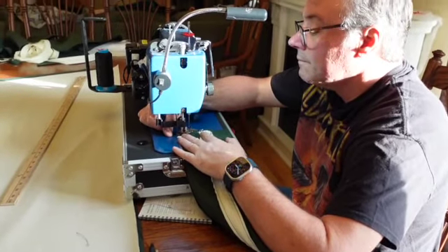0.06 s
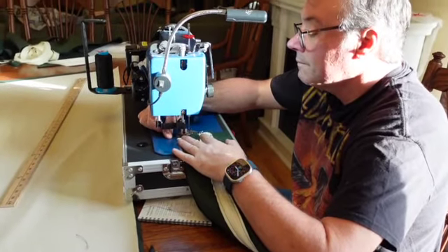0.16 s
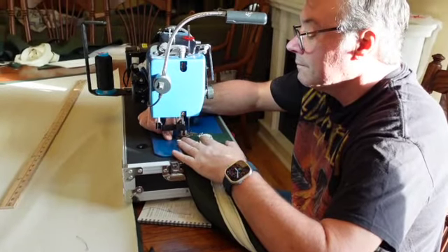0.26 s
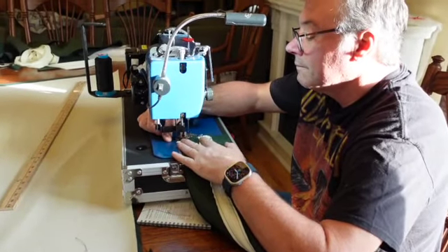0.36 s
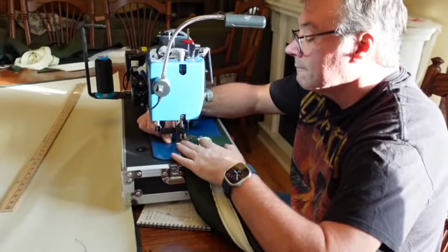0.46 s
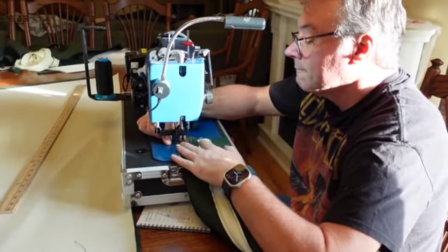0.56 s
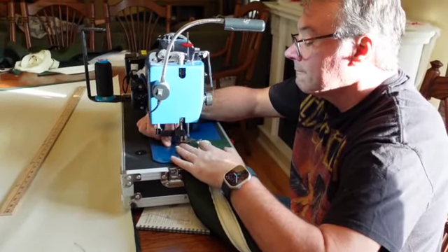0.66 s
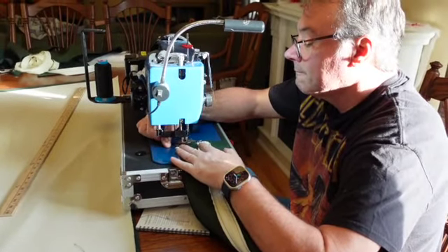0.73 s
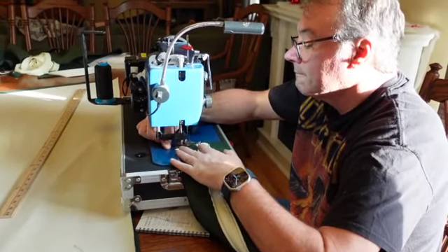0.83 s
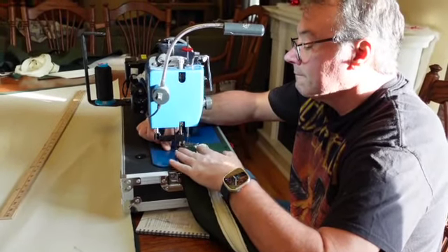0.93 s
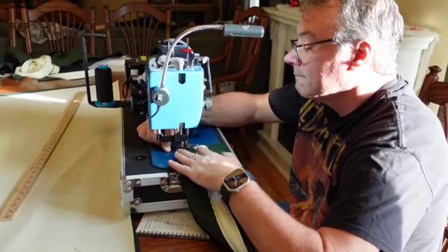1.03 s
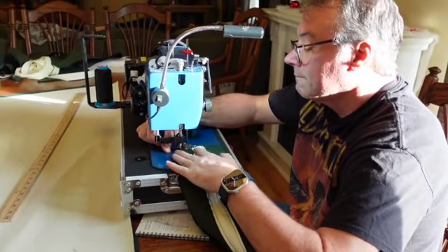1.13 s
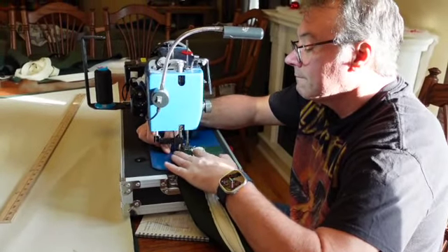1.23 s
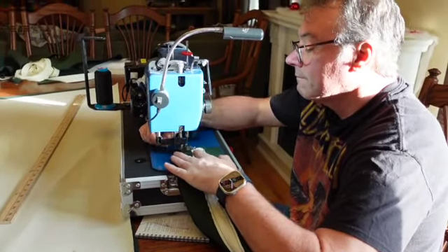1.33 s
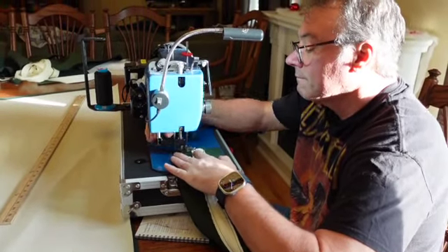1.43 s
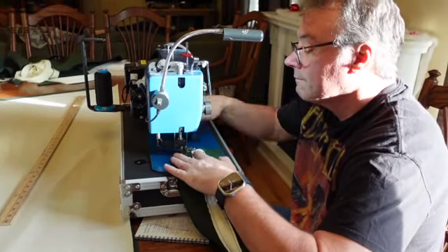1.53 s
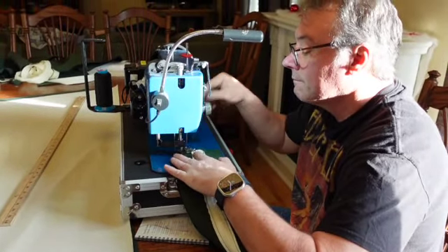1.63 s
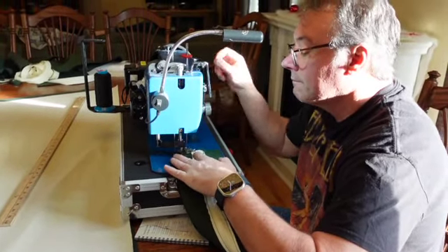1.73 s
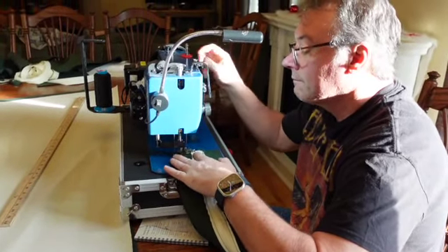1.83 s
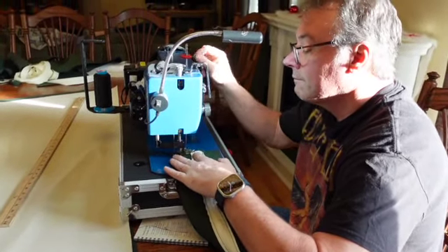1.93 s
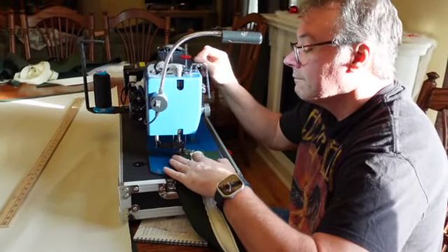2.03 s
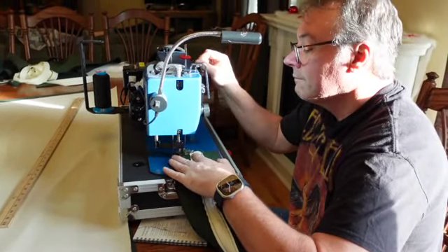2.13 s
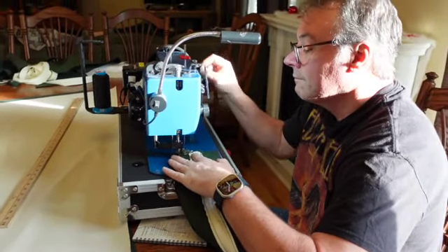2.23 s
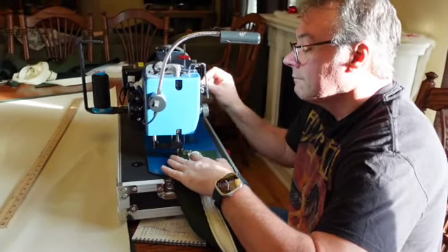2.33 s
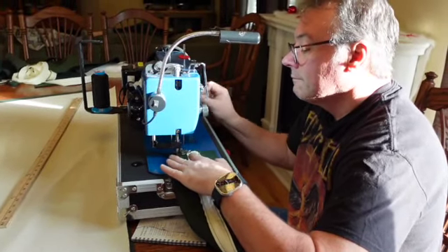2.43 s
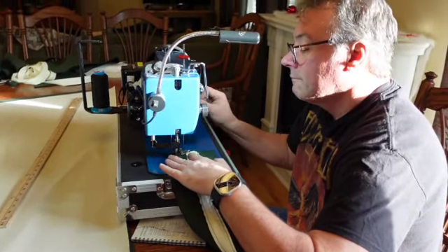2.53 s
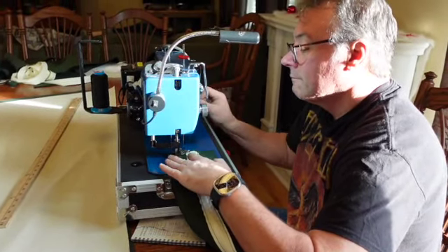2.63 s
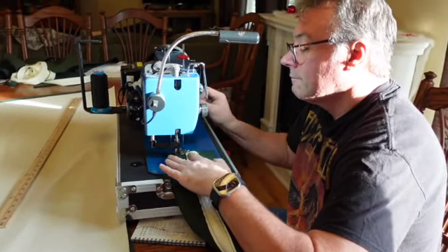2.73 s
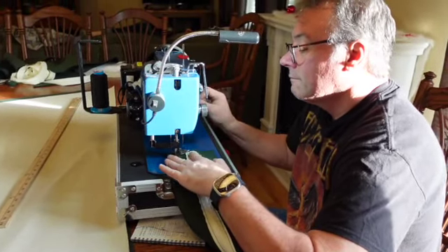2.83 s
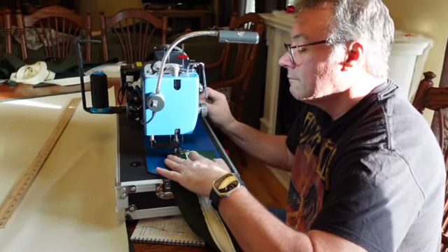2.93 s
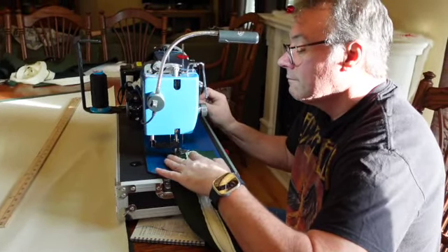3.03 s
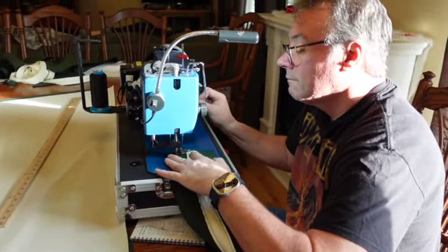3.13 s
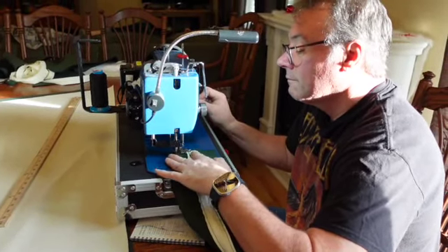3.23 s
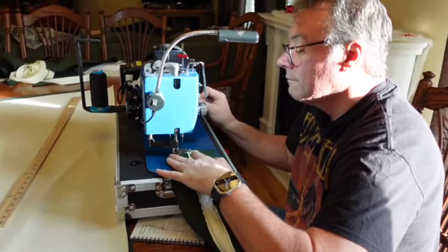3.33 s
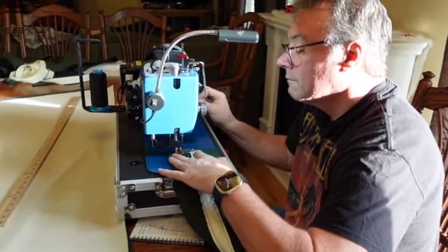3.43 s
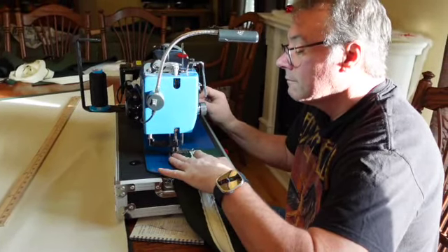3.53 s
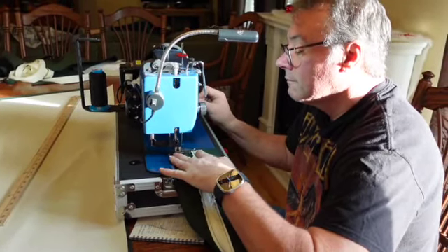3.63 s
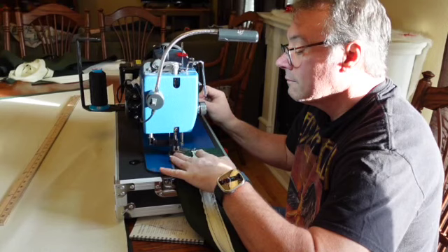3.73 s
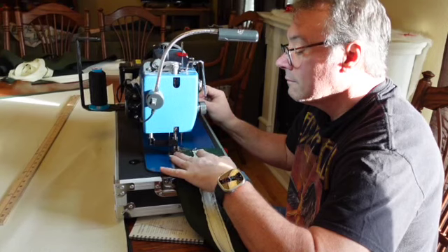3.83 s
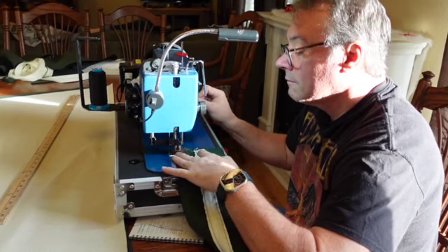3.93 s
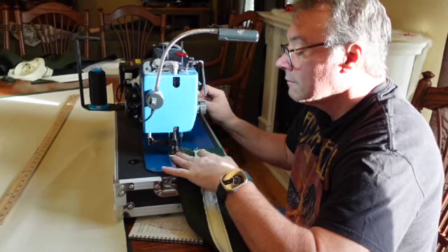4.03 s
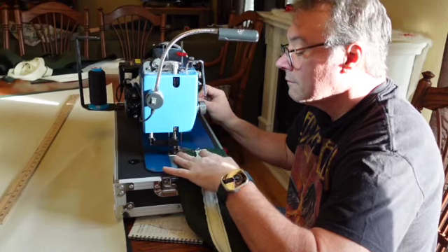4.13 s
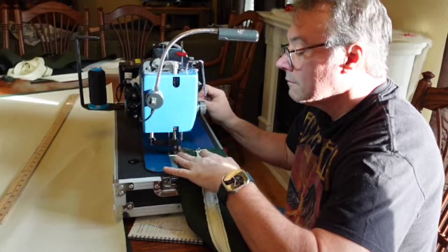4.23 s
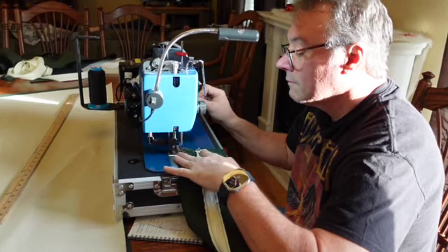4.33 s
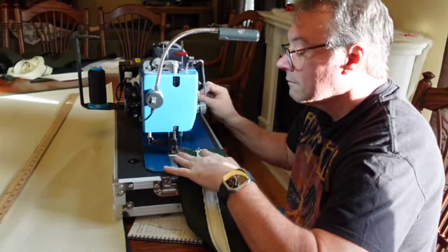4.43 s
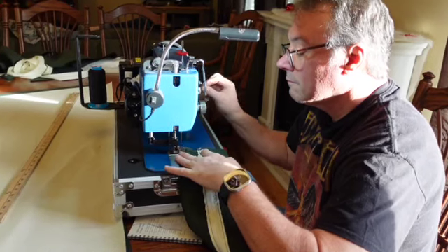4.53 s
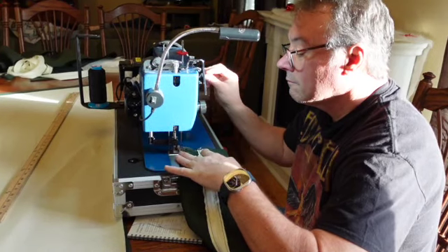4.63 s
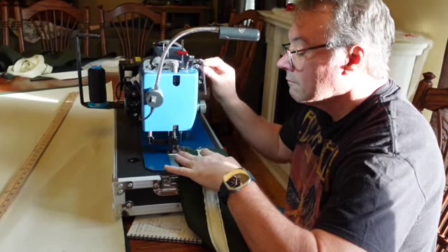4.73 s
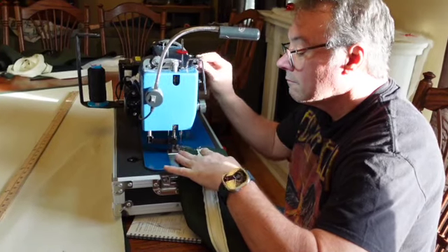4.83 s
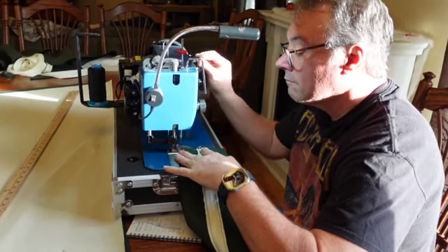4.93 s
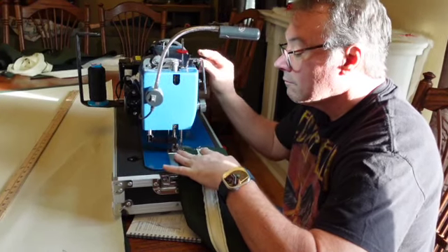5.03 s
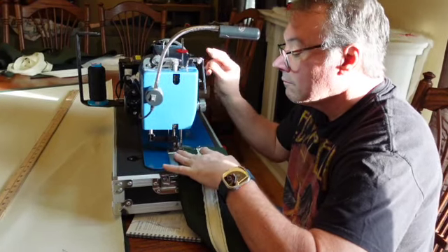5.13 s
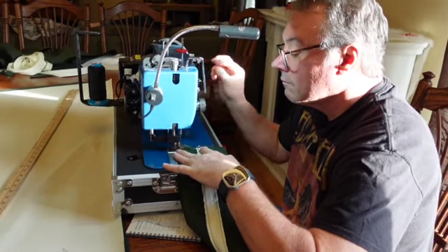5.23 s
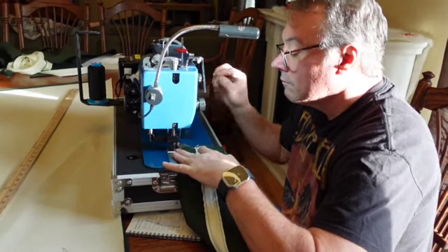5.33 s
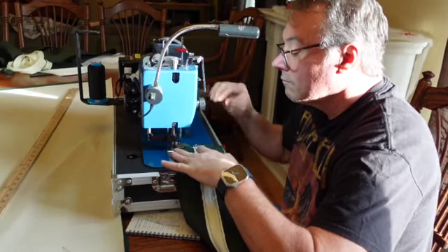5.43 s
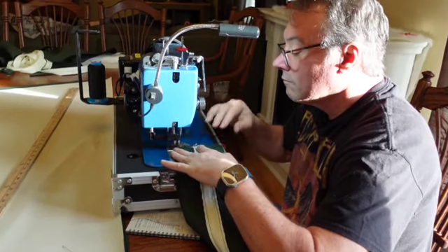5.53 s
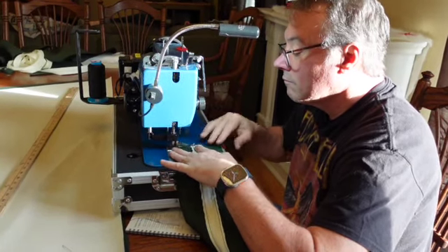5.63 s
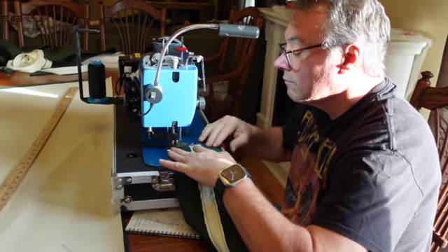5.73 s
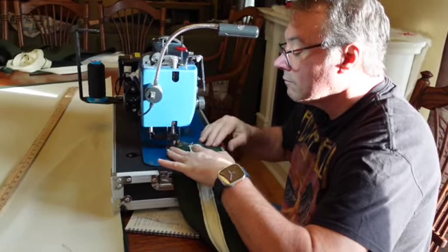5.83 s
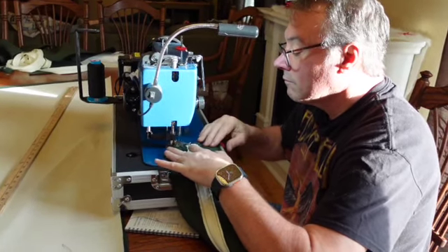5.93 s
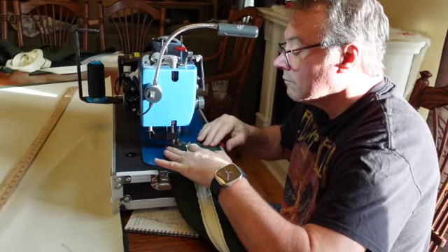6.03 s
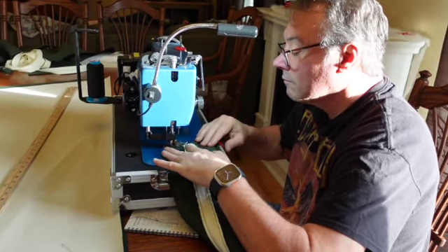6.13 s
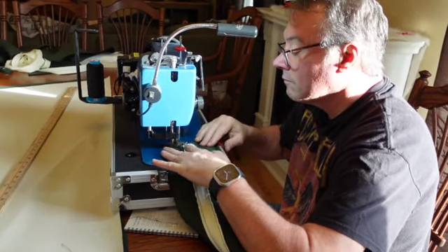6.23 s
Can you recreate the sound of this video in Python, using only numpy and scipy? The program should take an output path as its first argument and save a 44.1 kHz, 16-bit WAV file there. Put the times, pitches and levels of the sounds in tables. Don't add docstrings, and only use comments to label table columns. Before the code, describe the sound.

Close in a furnished room, an electric sewing machine spins up with a buzzing motor, rattling body and knocking stitches, then coasts to a stop. Hands tap it, a lever spring groans briefly and snaps home loudly. After a quiet gap a faster, whining run follows, sags almost to a stall, and a third run climbs until the end.

```python
import sys
import numpy as np
from scipy import signal
from scipy.fft import rfft, irfft
from scipy.io import wavfile
from scipy.ndimage import uniform_filter1d, minimum_filter1d

SR = 44100
rng = np.random.default_rng(int(sys.argv[2]) if len(sys.argv) > 2 else 0)


def dump_mix(stems):
    frames = np.atleast_2d(stems).T
    limited = np.clip(frames, -1, 1)
    pcm = np.round(limited * 32767).astype(np.int16)
    wavfile.write(sys.argv[1], SR, pcm)


def volts_from_db(level):
    exponent = np.asarray(level, float) / 20
    return 10 ** exponent


N = 276507
MAINS_HZ = 120
FULL_DB, FULL_BUZZ_DB = -24, -30


def rms_one(x):
    return x / np.sqrt(np.mean(x ** 2) + 1e-20)


def in_time(tables):
    t, gate = np.arange(N) / SR, np.zeros(N)
    for rows in tables:
        gate[round(rows[0][0] * SR):round(rows[-1][0] * SR)] = 1
    gate = minimum_filter1d(-minimum_filter1d(-gate, size=8000), size=8000)
    s, *columns = np.transpose(np.concatenate(tables))
    return [np.interp(t, s, c) for c in columns], uniform_filter1d(gate, size=900)


def at_hz(points, hz):
    point_hz, db = np.transpose(points)
    return np.interp(np.log(hz), np.log(point_hz), db)


def drift(rate):
    r = np.exp(-32 * np.pi * rate / SR)
    white = rng.standard_normal((N + SR) // 16 + 2)
    slow = signal.lfilter([1], [1, -2 * r, r * r], white)[SR // 16:]
    return np.interp(np.arange(N) / 16, np.arange(len(slow)), rms_one(slow))


def resonate(x, modes):
    out = 0
    for k, (hz, width_hz, db) in enumerate(modes):
        r = np.exp(-np.pi * width_hz / SR)
        poles = [1, -2 * r * np.cos(2 * np.pi * hz / SR), r * r]
        zeros = np.array([1, 0, -1]) * (1 - r * r) / 2
        out = out + (-1) ** k * volts_from_db(db) * signal.lfilter(zeros, poles, x + 1e-18)
    return out


def bands(spectrum, envelope):
    out, white = 0, rng.standard_normal((2, N))
    edges = 17 * 2 ** np.arange(0, 10.1, .5)
    for k, (low, high) in enumerate(zip(edges, edges[1:])):
        hz = np.sqrt(low * high)
        sos = signal.butter(2, [low, high], "band", fs=SR, output="sos")
        band = signal.sosfilt(sos, white[k % 2])
        out = out + volts_from_db(at_hz(spectrum, hz)) * envelope(hz) * band
    return out


def bursts(times, levels_db, decay_s):
    clicks = np.zeros(N)
    clicks[np.round(np.asarray(times) * SR).astype(int)] = volts_from_db(levels_db)
    fading = signal.lfilter([1], [1, -np.exp(-1 / (decay_s * SR))], clicks + 1e-18)
    return fading * rng.standard_normal(N)


def add(out, s, db, decay_s, modes, strike=0):
    start, t = round(s * SR), np.arange(SR // 8) / SR
    push = np.exp(-t / decay_s) * rng.standard_normal(len(t)) + strike * np.exp(-t * SR / 3)
    sound = resonate(volts_from_db(db) * push, modes)
    out[start:start + len(t)] += sound[:N - start]


def rattle(per_s, spread_db, clump_db):
    sizes = volts_from_db(spread_db * np.minimum(rng.exponential(1, N), 5)) * rng.choice([-1, 1], N)
    hits = sizes * (rng.random(N) < per_s / SR)
    return rms_one(hits * volts_from_db(clump_db * (drift(21.4) + 0.31 * drift(37))))


# f/Hz, level/dB per Hz
AIR_COLOUR = [(12, -28), (20, 1.5), (70, -8), (123, -10.5), (182, -8.5), (248, -15), (642, -25),
              (1190, -26.5), (2670, -37), (4420, -38.5), (7520, -49), (14700, -47), (16000, -61)]
# t/s, level/dB, fade/s
STEPS = [
    (.001, -13, 0.095),
    (2.75, -41, 0.17),
    (3.4, -30, 0.089),
    (4.63, -20, 0.16),
    (5.4, -44, 0.14),
]


def background():
    t = np.arange(N) / SR
    air = volts_from_db(-42.5) * rms_one(bands(AIR_COLOUR, lambda hz: 1))
    hum = volts_from_db(-47.5 + 2.44 * drift(4.2)) * np.sin(2 * np.pi * MAINS_HZ * t)
    boom = volts_from_db(-45.0) * rms_one(resonate(rng.standard_normal(N), [(74.8, 13.0, 0.0)]))
    weight = volts_from_db(-38) * np.ones(N)
    for s, db, fade_s in STEPS:
        since, rise_s = t - s, 0.007
        weight += volts_from_db(db) * np.clip(since / rise_s, 0, 1) * np.exp(-np.abs(since) / fade_s)
    sos = signal.butter(4, [11, 19], "band", fs=SR, output="sos")
    boards = signal.sosfilt(sos, rng.standard_normal(N))
    return air + hum + boom + weight * rms_one(boards)


# t/s, peak level/dB, f/Hz
TOUCHES = [(0.22, -33, 352), (1.758, -55, 301), (1.879, -23.5, 1050), (1.89, -25.5, 412), (1.961, -50, 366),
           (2.038, -33, 1050), (2.125, -46, 305), (2.139, -49, 334), (2.35, -27, 1245), (2.391, -32, 346),
           (2.449, -43, 453), (2.465, -44, 348), (2.797, -45, 393), (2.857, -32, 355), (4.683, -9.5, 1220)]
# t/s, level/dB, fade/s
RUSTLES = [
    (.001, -40, .03),
    (0.036, -46, .05),
    (.19, -50, .04),
    (2.13, -51, .05),
]


def touches():
    out = np.zeros(N)
    for s, db, hz in TOUCHES:
        modes = [(hz, 160, 0.0), (230, 80, -3), (2200, 300, -13), (5000, 3000, -26)]
        add(out, s, db + 8.0, .011, modes)
    for s, db, fade_s in RUSTLES:
        add(out, s, db, fade_s, [(1200, 700, 8.0), (2300, 900, 4), (4000, 2000, -5)])
    return out


def room(x, t60_s=0.39, dull_hz=5000):
    w = 2 * np.pi * np.arange(N // 2 + 1 + SR // 2) / (N + SR)
    dull = 1 / (1 + 1j * w * SR / (2 * np.pi * dull_hz))
    loops = 0
    for k, lag in enumerate(rng.uniform(.015, .045, 8) * SR):
        trip = volts_from_db(-60 * lag / SR / t60_s) * dull * np.exp(-1j * w * lag)
        loops = loops + (-1) ** k * trip / (1 - trip)
    return irfft(rfft(x, N + SR) * loops[:(N + SR) // 2 + 1], N + SR)[:N]


# t/s, motion level/dB, mains buzz level/dB
DRIVE = [
    [(.358, -70, -49), (.385, -62, -43.5), (.46, -45.5, -30), (.61, -30.5, -27.5), (.77, -26.5, -26),
     (.98, -24.5, -28), (1.24, -23.5, -30.5), (1.42, -32, -37), (1.58, -47.5, -41.5), (1.72, -101, -89)],
    [(2.958, -60, -43), (3.04, -46, -29), (3.15, -30, -24.5), (3.33, -22, -26.5), (3.56, -20.5, -29.5),
     (3.74, -20.5, -30.5), (3.9, -21.5, -33), (4.12, -25.5, -32.5), (4.56, -33, -27)],
    [(4.6, -25.5, -33), (4.72, -43, -28), (4.88, -43.5, -32), (5.19, -35.5, -29.5), (5.27, -26.5, -27),
     (5.42, -23.5, -26.5), (5.7, -22.5, -36), (5.9, -21.5, -36), (6.27, -21, -33)],
]
# t/s, f/Hz
SPEED = [
    [(.358, 20), (.6, 620), (.75, 690), (.86, 765), (.98, 800), (1.28, 795), (1.42, 560), (1.72, 20)],
    [(2.958, 20), (3.2, 630), (3.33, 810), (3.56, 1035), (3.8, 1055), (3.9, 975), (4.1, 780), (4.3, 655),
     (4.58, 560)],
    [(4.6, 540), (4.72, 150), (5.17, 120), (5.27, 620), (5.36, 745), (5.5, 800), (5.7, 900), (5.9, 960),
     (6.27, 1000)],
]


def controls():
    (motion_db, buzz_db), gate = in_time(DRIVE)
    (hz,), _ = in_time(SPEED)
    return (hz, motion_db, buzz_db), gate


# f/Hz, width/Hz, level/dB
MOTOR = [(245.7, 10.6, -2), (386, 25, -12.5), (734, 96, 1.5), (1000, 290, -9.5), (2016, 230, -16),
         (3640, 104, -27), (4134, 120, -15.5), (5280, 91, -37)]
# multiple of the mains pulse, level/dB
MAINS_LINES = [(2, -8.0), (6, -2.0), (8, -12.0), (9, -6.0), (17, -11.0), (18, -15.0)]


def buzz():
    (hz, motion_db, level_db), gate = controls()
    turn = MAINS_HZ * np.arange(N) / SR
    kicks = np.diff(np.floor(turn + .006 * drift(30)), prepend=0) * volts_from_db(drift(40))
    grit = 0.09 * rng.standard_normal(N) * np.exp(-1.5 * (turn % 1))
    wide = [(mode_hz, 5.5 * width_hz, 0.0) for mode_hz, width_hz, db in MOTOR]
    shell = rms_one(resonate(resonate(kicks + grit, MOTOR), wide))
    arcing = rms_one(resonate(rattle(14000, 2.6, 1.7), HOOK[:3] + HOUSING[-1:]))
    lines = 0
    for k, db in MAINS_LINES:
        lines = lines + volts_from_db(db + 3.1 * drift(4)) * np.sin(2 * np.pi * k * turn + k)
    return (gate > .5) * volts_from_db(level_db) * (volts_from_db(2.5) * shell + lines + volts_from_db(-33.0) * arcing)


# f/Hz, width/Hz, level/dB
TABLE = [(206, 67, -3.5), (232.6, 20.8, 0.5), (276, 19, -6), (364.7, 35, -3), (382, 138, -9), (513, 12, -8)]
BODY = [(524.4, 38, -4.5), (648, 64, -1), (767.3, 53, 0), (882, 66, -2), (1050, 180, -3.5), (1209, 160, -3),
        (1720, 1200, -20)]
HOUSING = [(2045, 273, 0.5), (2201, 50, 8.5), (2413, 86, -6.5), (3300, 1350, -13), (4228, 334, -7),
           (4700, 79, -10), (5170, 310, -12.5)]
HOOK = [(5530, 1600, 5.5), (8180, 300, 6), (8900, 1300, 0), (11120, 640, 2.5), (12500, 2400, -3),
        (16100, 710, -5.5)]
GUIDES = [(1640, 400, 13.5), (3500, 1200, -1), (5000, 1070, 3)]
# level at working speed/dB, share of motion/1, share of current/1, lag/s,
# swell as the needle pierces/dB
FOLLOW = [
    (-27, 0.54, 0.16, -0.0076, 3),
    (-22.5, 0.79, 0.17, -0.0048, 1.5),
    (-25, 0.96, 0.18, 0.019, 0.4),
    (-39, 0.83, -0.066, 0.034, 3),
    (-41, 0.51, 0.06, 0.051, 0.5),
]


def running():
    (hz, motion_db, buzz_db), gate = controls()
    t = np.arange(N) / SR
    pierced = np.transpose(STITCHES)[0]
    pierced = np.append(pierced, 2 * pierced[-1] - pierced[-2])
    stitch_turn = np.interp(t, pierced, np.arange(len(pierced)))
    swell = np.exp(3.9 * (np.cos(2 * np.pi * stitch_turn) - 1))
    sparks = rms_one(np.exp(-2.2 * (MAINS_HZ * np.arange(N) / SR % 1)))
    moving_db = np.where(gate > .5, motion_db, -70)
    # modes, (edge f/Hz, width/Hz, level/dB), clicks per s, clumping/dB, share of flare
    parts = [(TABLE, (260, 500, 0), 700, 2.5, .3), (BODY, (900, 1400, 0), 700, 1.6, .3),
             (HOUSING, (3400, 6000, 0), 2000, 1.8, .03), (HOOK, (11000, 12000, 0), 4000, 2.0, .03),
             (GUIDES, (3000, 8000, 0), 1500, 3.0, .03)]
    out = 0
    for follow, (modes, edge, per_s, clump_db, flare) in zip(FOLLOW, parts):
        full_db, share, strain, lag_s, swell_db = follow
        level_db = full_db + share * (np.interp(t - lag_s, t, moving_db) - FULL_DB) + swell_db * swell
        level_db += strain * (np.maximum(buzz_db, -50) - FULL_BUZZ_DB)
        push = rattle(per_s, 1.1, clump_db) * (1 - flare + flare * sparks)
        out = out + volts_from_db(level_db + 1.0) * rms_one(resonate(resonate(push, modes), [edge]))
    top = resonate(gate * out, [(240, 2.0, 2.5)])
    return gate * out + top


def whine():
    (hz, motion_db, buzz_db), gate = controls()
    gear_ratio, pulley_teeth, pulley_wobble = 1.66, 13, .7
    hz = uniform_filter1d(hz, size=3000)
    below_knee_hz = np.maximum(650 - hz, 0)
    level_db = -25 - .11 * below_knee_hz + .35 * (motion_db - FULL_DB)
    mesh_db = -14 + 15 * np.exp(-((gear_ratio * hz - 1110) / 120) ** 2)
    phase = 2 * np.pi * np.cumsum(hz * (1 + .006 * drift(15) + .010 * drift(60))) / SR
    throb = 1 + pulley_wobble * np.sin(phase / pulley_teeth)
    belt = volts_from_db(3.5 * drift(20)) * throb * np.sin(phase)
    octave = volts_from_db(4.5 * drift(40)) * np.sin(2 * phase)
    belt += resonate(octave, [(2140, 79, 6.8)])
    mesh = volts_from_db(mesh_db + 2.5 * drift(14)) * np.sin(gear_ratio * phase)
    return gate * volts_from_db(level_db) * (belt + mesh)


def turns(share, hz, motion_db, gate):
    last_stitch_teeth, spread_db = 235, 2.0
    teeth = np.cumsum(hz * gate + 1) / SR
    marks = teeth[(np.transpose(STITCHES)[0] * SR).astype(int)]
    wanted = marks + share * np.diff(marks, append=marks[-1] + last_stitch_teeth)
    index = np.searchsorted(teeth, wanted[wanted < teeth[-1]])
    uneven = spread_db * rng.standard_normal(len(STITCHES))[:len(index)]
    return index / SR, motion_db[index] - FULL_DB + uneven


def contacts(table, after=0):
    (hz, motion_db, buzz_db), gate = controls()
    rows = []
    for share, level_db in table:
        times, motions_db = turns(share + after, hz, motion_db, gate)
        rows += [(s, db + level_db) for s, db in zip(times, motions_db)]
    return np.transpose(rows)


# t/s, knock level/dB, table level/dB, housing level/dB, hook catch/turn
STITCHES = [(0.47, -26.5, 9, -21, 0.24), (.651, -4.5, -7, -15, 0.03), (0.987, -2, -1, -15, 0.57),
            (1.26, -3, -25, -14, 0.5), (1.605, -52, -13, -12, 0.57), (3.177, -24, -6, -16, 0),
            (3.441, -6, 3, -11, 0.14), (3.688, 0.5, -14, -2, 0.2), (3.885, 4, -9, -22, 0.19),
            (4.178, 2, -15, -7, 0.22), (4.601, -2, -9, -5, 0.01), (5.369, 3.5, -33, -5, 0.31),
            (5.663, 5, -30, -3.5, 0.21), (5.932, -1, -16, 0, .22), (6.175, 4, -25, -3, 0.35)]
# phase/turn, level at working speed/dB
FEED_KNOCKS = [
    (.36, -18),
    (.67, -17),
]
# phase after the catch/turn, level/dB
HOOK_TICKS = [
    (0, -23.5),
    (.14, -22),
]
# t/s, peak level/dB, lower part level/dB
TICKS = [(0.625, -20, 4.5), (0.8817, -13.5, -3), (0.98, -16.5, -8), (1.009, -19, 2), (1.2484, -23, -5),
         (1.2843, -18.5, -8), (1.489, -29.5, 3), (1.563, -29, -3), (1.608, -31, 3), (1.879, -54, -1),
         (2.3464, -44, -10), (2.512, -4, -4.5), (3.041, -40, 12), (3.1854, -28, 0), (3.29, -20.5, 0),
         (3.439, -20, -9), (3.5417, -20, -9), (3.664, -24, 1), (3.887, -20, 1), (4.161, -20, 0),
         (4.571, -19, -5), (4.9077, -29.5, 8.5), (5.2923, -25, -2), (5.342, -22.5, -1), (5.375, -17, -11),
         (5.382, -10, -9), (5.6461, -22, 0), (5.668, -14.5, -3), (5.8893, -20, -11), (6.158, -17, -2)]


def stitches():
    pierce_s, pierce_db, pierce_low_db, pierce_high_db, catch = np.transpose(STITCHES)
    feed_s, feed_db = contacts(FEED_KNOCKS)
    s, db = np.append(pierce_s, feed_s), np.append(pierce_db, feed_db)
    low_db = np.append(pierce_low_db, -23 + 0 * feed_s)
    high_db = np.append(pierce_high_db, -32 + 0 * feed_s)
    out = resonate(bursts(s, db + low_db + 19.0, 0.012), TABLE)
    for mode in BODY:
        favour_db = rng.uniform(-4.5, 1.3, len(s))
        out += resonate(bursts(s, db - 0.5 + favour_db, 0.02), [mode])
    out += resonate(bursts(s, db + high_db - 0.5, 0.02), HOUSING[:2])

    hook_ticks = contacts(HOOK_TICKS, after=catch)
    release = contacts([(0.57, -25)])
    hook_s, hook_db = np.hstack([hook_ticks, release])
    s, db, low_db = np.hstack([np.transpose(TICKS), [hook_s, hook_db, -5 + 0 * hook_s]])
    out += resonate(bursts(s, db + 1, .0014), HOOK)
    out += resonate(bursts(s, db + low_db + 14.0, 0.011), HOUSING[3:])
    out += resonate(bursts(s, db + low_db + 5.0, 0.046), HOUSING[4:])
    parts_hz = (8800, 9540, 10340, 10560, 12100)
    dealt = rng.integers(0, len(parts_hz), len(s))
    for k, part_hz in enumerate(parts_hz):
        mine = dealt == k
        out += resonate(bursts(s[mine], db[mine] + 3, .009), [(part_hz, 500, 0.0)])
    return out


# t/s, peak level/dB, f/Hz, housing level/dB
CLATTER = [(0.524, -15, 660, -21), (0.6, -8, 1060, -15), (0.649, -3, 676, -25), (0.709, -8, 670, -19),
           (0.784, 2, 734, -23), (0.926, -1, 780, -19), (0.972, -13, 794, -19), (1.039, -11, 770, -11),
           (1.087, -6, 789, -12), (1.17, -2, 778, -14), (1.269, -4, 800, -11), (1.365, -1, 1210, -19),
           (1.461, -6.5, 1100, -15), (1.881, -27, 1030, -11), (2.512, -5, 1134, -19),
           (3.043, -22, 921, -18), (3.099, -13, 720, -20), (3.194, -4, 729, -12), (3.276, -3, 1140, 1),
           (3.466, -8, 750, -10), (3.536, 0.5, 1200, -12), (3.689, -2, 650, -1), (3.861, -13, 1020, -5),
           (4.011, -5, 770, -16), (4.125, -15, 721, 3), (4.196, -4, 636, -10), (4.243, -10, 700, -15),
           (4.501, -8, 680, -17), (4.599, -6, 860, -6), (4.683, -6, 643, -23), (4.717, -15, 740, -17),
           (4.751, -29, 716, -15), (4.901, -8, 744, -15), (5.018, -11.5, 650, -16), (5.05, -27, 778, -17),
           (5.175, -9, 817, -15), (5.234, -17, 670, -7), (5.277, -1.5, 775, -13), (5.369, -1, 810, -4),
           (5.594, -10, 845, 1), (5.631, -17, 1100, -10), (5.663, -9, 762, -8), (5.793, -16, 1000, -5),
           (5.826, -12, 970, -13), (5.888, -8, 980, -5), (5.934, 0, 716, -5), (6.006, 5, 880, -12),
           (6.087, -4, 830, -10), (6.141, -8, 960, -8), (6.249, -6, 1130, -12)]
# t/s, peak level/dB, f/Hz
RAPS = [(0.8181, -10, 2210), (0.8735, -7, 2110), (0.9184, -23, 2160), (0.9877, -20, 2000),
        (1.0271, -17, 2160), (1.0581, -13, 2200), (1.1199, -6, 2220), (1.1713, -18, 2180),
        (1.2431, -16, 2100), (1.303, -21, 2140), (1.3958, -12, 2150), (2.5096, -24, 2240),
        (3.2062, -17, 2170), (3.2466, -10, 2190), (3.284, -7, 2210), (3.3499, -20, 2160),
        (3.3923, -9, 2130), (3.4247, -14, 2190), (3.4676, -13, 2180), (3.5085, -18, 2030),
        (3.5858, -15, 2050), (3.6502, -10, 2000), (3.7001, -11, 2170), (3.7774, 0, 2170), (3.812, -6, 2090),
        (3.8437, -7, 2040), (3.8846, -7, 2170), (4.0303, -17, 2170), (4.152, -11, 2200), (4.2997, -7, 2200),
        (4.4613, -22, 2130), (4.6055, -26, 2150), (5.1722, -15, 2190), (5.2351, -27, 2250),
        (5.2865, -18, 2210), (5.3234, -14, 2160), (5.3658, -14, 2230), (5.4017, -15, 2170),
        (5.4431, -3, 2170), (5.5913, -1, 2170), (5.6242, -15, 2070), (5.6556, -16, 2100),
        (5.6935, -6, 2190), (5.7863, -5, 2130), (5.8926, -11, 2180), (5.9509, -6, 2220),
        (6.0098, -14, 2190), (6.1016, -14, 2110), (6.1355, -2, 2180), (6.2263, -10, 2230)]
# t/s, peak level/dB
PINGS = [(0.6258, -17), (0.9818, -18), (1.1673, -18), (3.5186, -14), (3.829, -29), (5.2714, -14),
         (5.5934, -22), (5.745, -30), (5.84, -20), (5.9947, -25.5), (6.0846, -21), (6.2277, -24)]


def clatter():
    out = np.zeros(N)
    strike = 5
    for s, db, hz, housing_db in CLATTER:
        modes = [(hz, 81, 0.0), (2170, 160, housing_db - 6), (250, 90, -9), (4200, 1500, -28)]
        add(out, s, db + 4.5, 0.016, modes, strike)
    for s, db, hz in RAPS:
        add(out, s, db + 10, 0.0068, [(hz, 59, 0.0), (4190, 250, -12)], strike)
    for s, db in PINGS:
        add(out, s, db + 16, .004, [(3290, 110, 0.0)], strike)
    return out


# f/Hz, width/Hz, speed/Hz, speed range/Hz, level/dB
PLATES = [
    (4190, 120, 850, 35, -33),
    (5040, 70, 1045, 30, -35),
]


def plates():
    (hz, motion_db, buzz_db), gate = controls()
    out = 0
    for plate_hz, width_hz, speed_hz, range_hz, db in PLATES:
        ring = rms_one(resonate(rng.standard_normal(N), [(plate_hz, width_hz, 0.0)]))
        out = out + volts_from_db(db) * np.exp(-((hz - speed_hz) / range_hz) ** 2) * ring
    return gate * out


# t/s, f/Hz, level/dB, rub level/dB
GROAN = [
    (2.12, 234, -58, -40),
    (2.145, 222, -30.5, -46),
    (2.18, 189.5, -38, -52),
    (2.235, 236, -28.5, -44),
    (2.31, 240, -34, -47),
    (2.39, 228.6, -41, -43),
    (2.46, 209, -36, -47),
    (2.5, 206, -50, -36),
]
# t/s, level/dB, brightness/dB
SNAP = [
    (2.509, -6.5, -23),
    (2.511, -3, -14),
    (2.514, -16, -11),
    (2.516, -17, 2),
    (2.523, -5, -19),
    (2.54, -13, -15),
    (2.552, -30, 12),
]
# f/Hz, width/Hz, level/dB
CASE = [(74, 4.2, -8), (209, 21, 8.5), (358, 3.9, 10), (390, 39, 2), (667, 200, -2), (1120, 210, -1.5),
        (1850, 1200, -15.5)]
# f/Hz, level/dB per Hz
SNAP_COLOUR = [(35, -31), (60, -1.5), (124, -13), (193, -11), (480, -26), (1090, -12), (1510, -14.5),
               (4750, -15), (7570, -22), (14600, -22), (16000, -41)]
# f/Hz, t60/s
SNAP_T60 = [(100, 0.98), (1000, 0.4), (4000, 0.38), (15000, 0.24)]


def lever():
    (hz, level_db, rub_db), gate = in_time([GROAN])
    groan = volts_from_db(level_db + 3.1 * drift(30)) * np.sin(2 * np.pi * np.cumsum(hz) / SR)
    rub_modes = [(363, 70, -3.5), (504, 59, -4.5), (775, 160, -11.0)]
    rub = volts_from_db(rub_db - 0.5) * rms_one(resonate(rattle(510, 2.4, 0.79), rub_modes))
    s, db, bright_db = np.transpose(SNAP)
    snap = resonate(bursts(s, db + 10.5, 0.0042), CASE)
    snap += resonate(bursts(s, db + bright_db, 0.00091), HOOK + HOUSING[2:])
    since = np.arange(N) / SR - s[1]
    swell = np.clip(since / 0.0059, 0, 1)
    tail = bands(SNAP_COLOUR, lambda hz: swell * volts_from_db(-60 * np.abs(since) / at_hz(SNAP_T60, hz)))
    return gate * (groan + rub) + snap + volts_from_db(-8.0) * tail / np.abs(tail).max()


def scene():
    machine = running() + buzz() + whine() + stitches() + clatter() + plates() + touches() + lever()
    middle = machine + volts_from_db(-15.5) * room(machine) + background()
    side = signal.sosfilt(signal.butter(2, 35, fs=SR, output="sos"), rng.standard_normal(N))
    return middle + volts_from_db(-57) * rms_one(side) * np.array([[1], [-1]])


def top_cut(x):
    return signal.sosfilt(signal.butter(12, 15700, fs=SR, output="sos"), x)


def record(dry):
    top, knee = .92, 5
    rounded = dry / (1 + np.abs(dry / top) ** knee) ** (1 / knee)
    return top_cut(rounded)


dry = scene()
out = record(dry)
dump_mix(out)
```